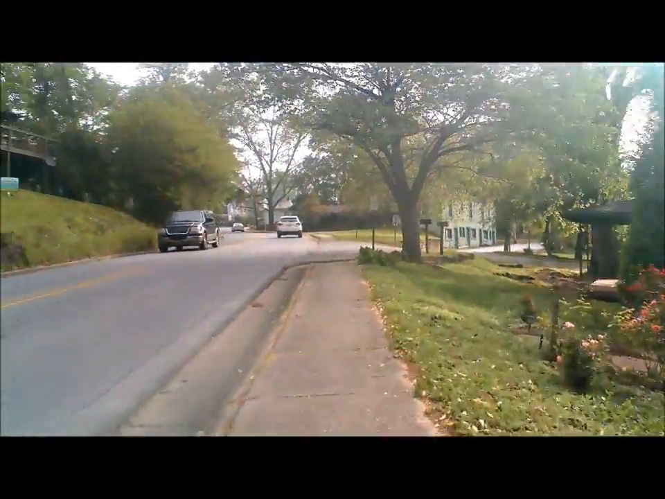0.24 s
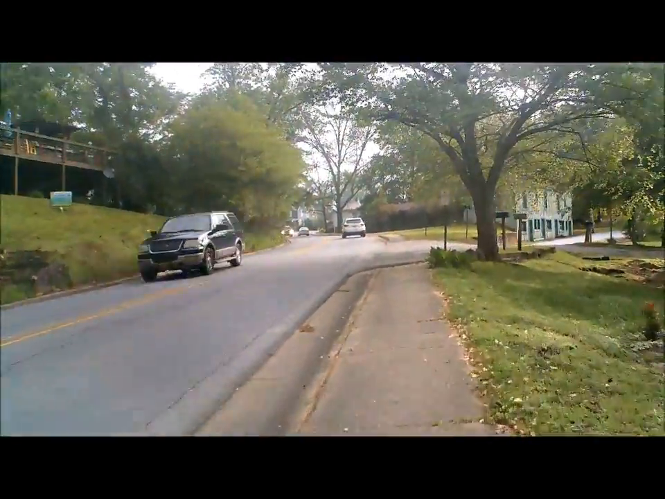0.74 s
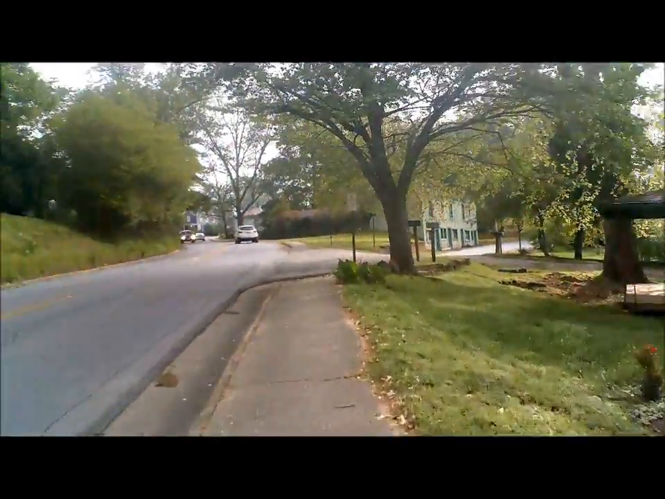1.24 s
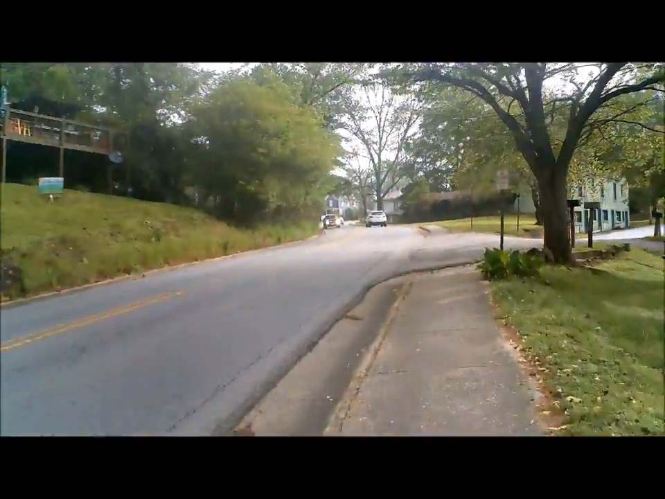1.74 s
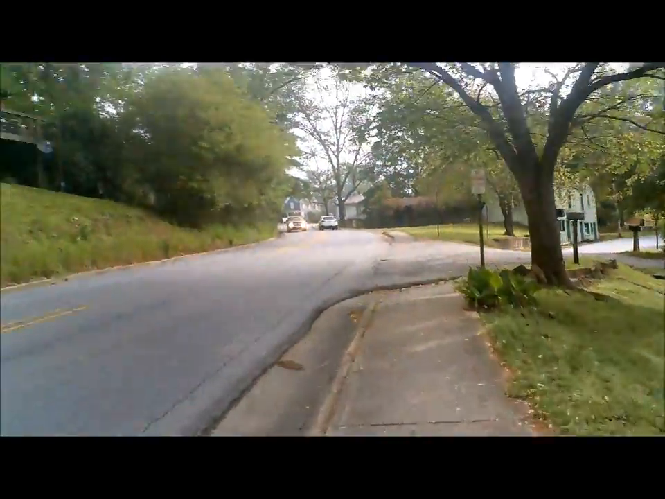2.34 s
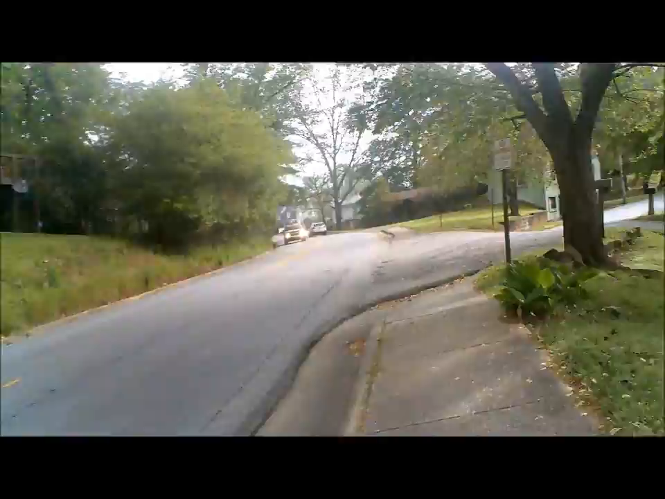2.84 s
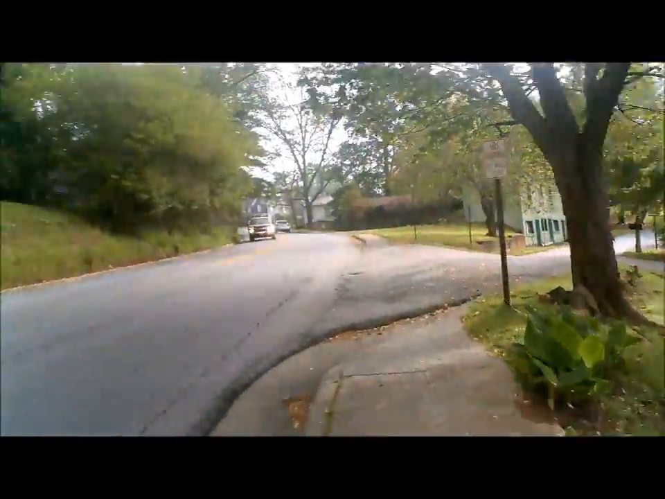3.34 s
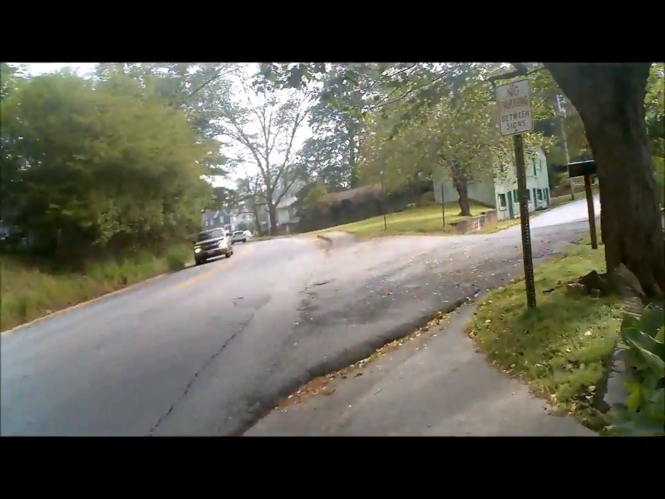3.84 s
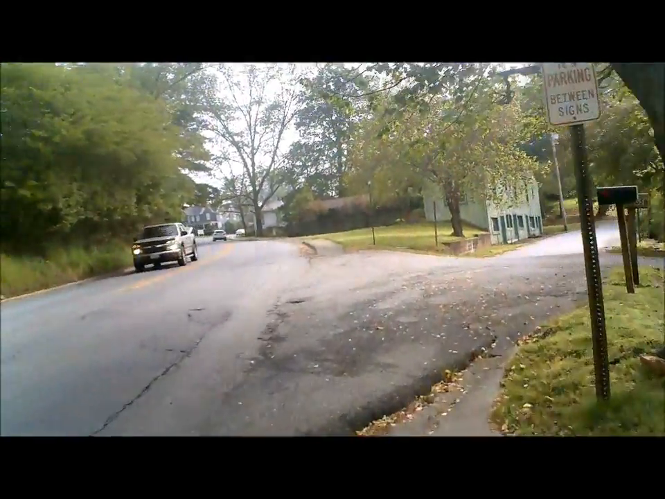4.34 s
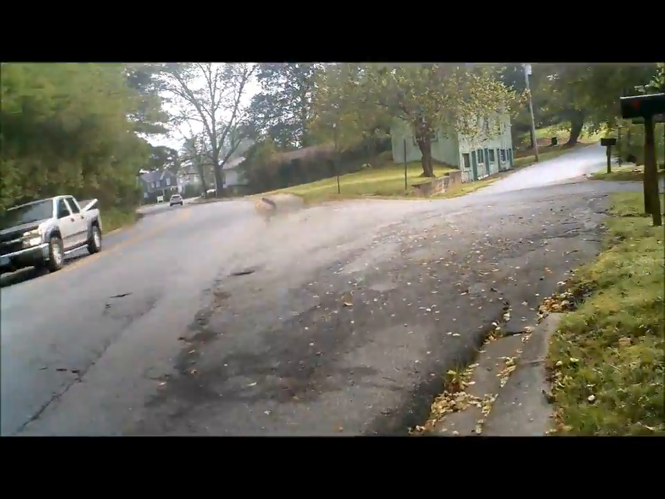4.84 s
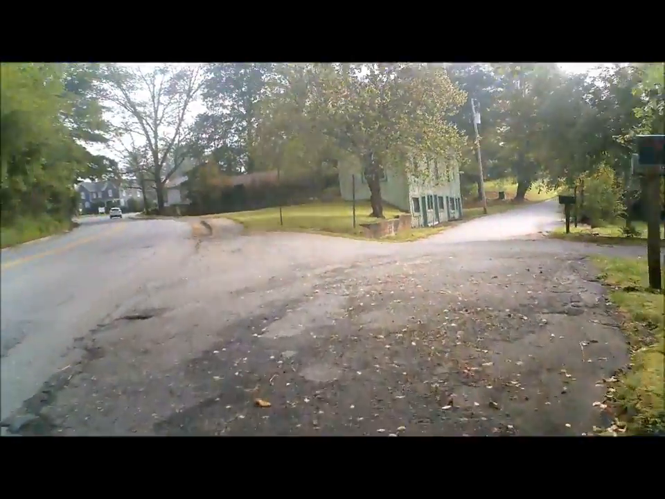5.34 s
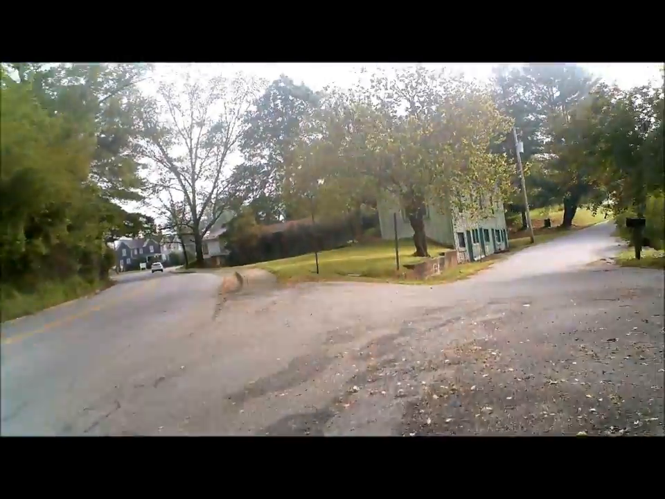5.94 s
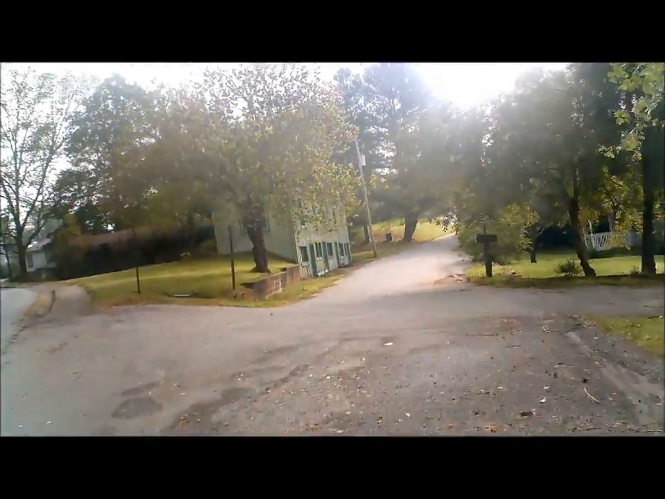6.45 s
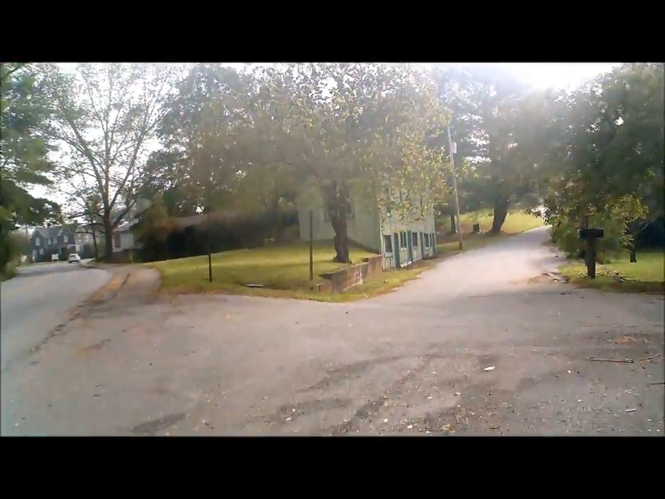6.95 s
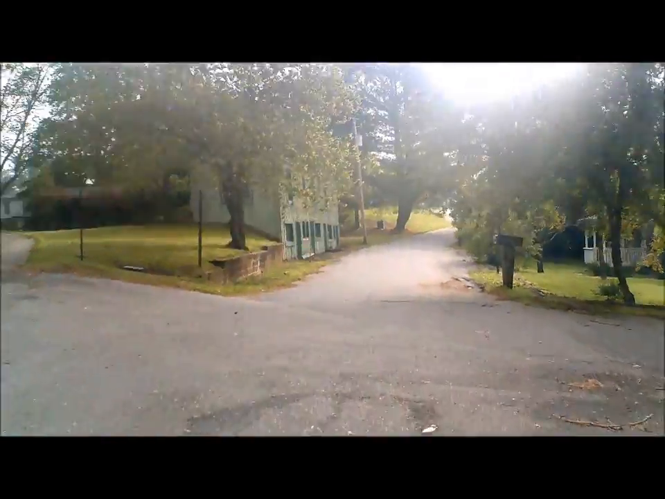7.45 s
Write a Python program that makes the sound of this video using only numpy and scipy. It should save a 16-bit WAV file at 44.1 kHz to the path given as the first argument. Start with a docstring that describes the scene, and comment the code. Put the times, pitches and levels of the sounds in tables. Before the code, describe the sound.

Close on a bicycle's handlebar outdoors, a loose mount knocks in uneven bursts of click, hollow clack and dull thud. The hardest jolt comes early, nearly overloading the microphone. More clusters follow over pavement joints, with short grainy shudders, then the surface smooths, leaving low frame hum, soft tyre roar, lumpy air, hiss and a few faint pings.

```python
"""On a pavement, a bicycle rolls along with a camera on its handlebar. Shaped noise makes the tyre roar and the
lumpy air on the microphone; noise through resonances makes the frame hum, the fork and a faint chatter.
At joints and kerbs the loose mount knocks: decaying sine modes sound its click, clack, hollow note and thud.
Each knock also jolts the frame and leaves a grainy shudder. Two kerb drops push the microphone; on smooth
ground there are single pings. The preamplifier hisses and clips, and the treble ends below 8 kHz."""
import sys
import numpy as np
from scipy import signal
from scipy.fft import rfft, irfft, next_fast_len
from scipy.io import wavfile
from scipy.ndimage import uniform_filter1d, map_coordinates

SR = 44100
rng = np.random.default_rng(int(sys.argv[2]) if len(sys.argv) > 2 else 0)


def output_pcm(signal):
    """Save a mono or channel-first signal as 16-bit PCM at the path in sys.argv[1].

    Samples are clipped to [-1, 1] before scaling.
    """
    pcm = np.clip(np.atleast_2d(signal).T, -1, 1) * 32767
    wavfile.write(sys.argv[1], SR, np.round(pcm).astype(np.int16))


N = 340011


def amp(db):
    """Decibels to amplitude."""
    return 10 ** (np.asarray(db) / 20)


def unit(x):
    """x scaled to rms 1."""
    return x / np.sqrt(np.mean(x ** 2) + 1e-20)


def wobble(rate):
    """A smooth random curve, rate knots a second."""
    knots = rng.standard_normal(int(N * rate / SR) + 4)
    return map_coordinates(knots, [np.arange(N) * rate / SR])


def filtered(x, response):
    """x shaped by a complex response of frequency."""
    size = next_fast_len(N + SR // 2)
    spectrum = rfft(x, size) * response(np.fft.rfftfreq(size, 1 / SR))
    return irfft(spectrum, size)[:N]


def coloured(points):
    """Noise of rms 1 whose spectrum follows the (hz, db) points."""
    points_hz, points_db = np.transpose(points)

    def response(hz):
        return amp(np.interp(np.log(hz + 1), np.log(points_hz), points_db))

    return unit(filtered(rng.standard_normal(N), response))


def resonances(modes):
    """Causal response of (hz, width_hz, level_db) modes, summed with alternating sign."""
    def response(f):
        total = 0
        for k, (hz, width_hz, db) in enumerate(modes):
            damping = 1j * f * width_hz
            total = total + (-1) ** k * amp(db) * damping / (hz * hz - f * f + damping)
        return total

    return response


# single knocks of the mount: start_s, click_db [peak], click_hz [favoured centre], hollow_db [peak],
# thud_db [peak], thud_hz [favoured centre], clack_db [peak], length [decay factor]
KNOCKS = [(0.138, -37, 2670.0, -29.5, -29.5, 810.0, -39.5, 0.97),
          (0.246, -23, 3480.0, -18.5, -13.5, 744, -28, 1.38),
          (0.3146, -37, 2410.0, -28.5, -31.0, 676, -40, 0.89),
          (0.4406, -6.0, 2730.0, -14, -15.0, 760, -18, 0.8),
          (0.5555, -9, 3380.0, -13, -16.5, 870.0, -15, 0.96), (0.6301, -43, 3430, -33, -32, 720, -58, 2.4),
          (0.6514, -5, 2960.0, -13.5, -20, 760, -10.5, 0.89),
          (0.7417, -31.5, 2620.0, -28.5, -28.5, 740, -29.5, 1.04),
          (0.8003, -6.5, 2640.0, -11, -7, 706, -28, 1.2), (0.808, 3.5, 3280.0, -2, -1, 700, 2.5, 0.89),
          (0.82, -17.5, 2750.0, -9, -10.5, 700.0, -19, 1.45),
          (0.837, -12.5, 3770.0, -14, -16, 664, -30, 0.59),
          (0.864, -48, 3010.0, -28, -28.5, 685, -38.5, 1.1),
          (0.9551, -19.5, 2600.0, -20, -8.5, 790, -19.5, 1.3),
          (1.0138, -27.5, 2460.0, -22.5, -18.5, 740.0, -35, 1.7),
          (1.042, -38, 2850.0, -27, -19, 700, -39.5, 1.15),
          (1.088, -40, 3300.0, -37, -18.5, 560.0, -41, 2.1),
          (1.1402, -16.5, 3430.0, -18.5, -20.5, 750, -36, 0.85),
          (1.2728, -40.5, 2630.0, -37, -26.5, 740, -44, 1.2),
          (1.343, -35, 3520.0, -36.5, -26.5, 656, -40, 3.3),
          (1.69, -39, 2530.0, -32.5, -31, 654, -48.5, 0.89), (1.713, -40.5, 2740, -44, -48.5, 703, -57, 3),
          (1.886, -51, 3550.0, -29, -23.5, 773, -42.5, 1.5),
          (2.1725, -42.5, 2640.0, -52, -44.0, 760.0, -57, 1.9),
          (2.2628, -29, 2680.0, -18.5, -13.5, 704, -32, 1.6),
          (2.313, -34.5, 3530.0, -44, -24.5, 810.0, -42, 1.4),
          (2.3492, -31, 2540.0, -25, -24.0, 830.0, -31.0, 1.5),
          (2.3835, -21.5, 2950.0, -15, -6.5, 770.0, -26, 1.5),
          (2.403, -40, 3060.0, -39, -17, 670, -46, 0.95), (2.425, -44, 3300, -28.5, -33, 740, -42, 0.67),
          (2.4693, -44, 3010.0, -30, -20.5, 766, -35, 1.65),
          (2.523, -37.5, 2530.0, -28.5, -35.5, 716, -38, 2.9),
          (2.5984, -6.5, 3270.0, -1, -19.5, 780, -18, 0.94),
          (2.67, -44.5, 2400, -43.5, -42.5, 740, -60, 1.5),
          (2.7382, -36, 2720.0, -23.5, -24, 687, -50.5, 2), (2.772, -43, 3070.0, -45, -27, 670.0, -52, 1),
          (2.8175, -36, 3490.0, -34.5, -23.5, 690.0, -39.5, 1.5),
          (2.8511, -46, 2970.0, -37.5, -23, 670.0, -44.0, 1.44),
          (2.912, -41.0, 2710.0, -38, -26, 690.0, -48.5, 1.3),
          (3.009, -47, 3460.0, -50.5, -44.5, 745, -67, 1.2),
          (3.1124, -46, 3400.0, -43, -28, 790.0, -43, 0.66),
          (3.228, -17, 2450.0, -7, -11.5, 660, -14.5, 0.92),
          (3.2473, -36.5, 2780.0, -22.5, -23.5, 630.0, -39, 1.9),
          (3.3221, -37.5, 2580.0, -20, -19.5, 674, -38, 2),
          (3.361, -20, 3300.0, -9.5, -6.5, 734, -16.5, 1.72),
          (3.6295, -6, 2770.0, -1, -16.5, 810, -17, 0.83), (3.693, -46, 3400, -41.5, -39, 640, -46, 1.4),
          (3.7295, -40, 2700.0, -35, -26.5, 690.0, -44, 1.75),
          (3.774, -33.5, 2490.0, -31.5, -24, 776, -41, 1.83),
          (3.8686, -33.5, 3070.0, -32.5, -18.5, 670, -51, 1.4),
          (4.2154, -25, 3090.0, -17.5, -10, 720.0, -22.5, 1.61),
          (4.2276, -32, 3490.0, -28, -22, 635, -34, 0.97),
          (4.372, -23.5, 2710.0, -13, -10.5, 800.0, -33, 1.47),
          (4.393, -44, 2770.0, -24.5, -19.5, 600.0, -42, 1.04),
          (4.813, -57, 3500.0, -49, -33.5, 730.0, -47, 1.24),
          (5.244, -47, 2770.0, -45.5, -34, 807, -50, 1.1), (7.6089, -39, 3000, -42.5, -45, 712, -48, 0.39),
          (7.694, -41, 2630.0, -52, -30.5, 790, -53, 1.35)]
# runs in which the mount buzzes: start_s, end_s, and mean click_db, hollow_db, thud_db, clack_db [peaks]
BUZZES = [(1.099, 1.195, -34, -23, -20.5, -38)]
BUZZ_GAP_S, BUZZ_JITTER_S, BUZZ_SCATTER_DB = 0.0125, 0.002, 2.5
BUZZ_CLICK_HZ, BUZZ_THUD_HZ, BUZZ_LENGTH = 3420, 740, 0.94


def blows():
    """Every contact of the mount: the single knocks and the quick, uneven runs of a buzz."""
    contacts = list(KNOCKS)
    for start, end, click_db, hollow_db, thud_db, clack_db in BUZZES:
        for s in np.arange(start, end, BUZZ_GAP_S):
            late_s = rng.normal(0, BUZZ_JITTER_S)
            click, hollow, thud, clack = rng.normal(0, BUZZ_SCATTER_DB, 4)
            contacts.append((s + late_s, click_db + click, BUZZ_CLICK_HZ, hollow_db + hollow,
                             thud_db + thud, BUZZ_THUD_HZ, clack_db + clack, BUZZ_LENGTH))
    return contacts


# the steady ride: time_s, hum_db [frame], roar_db [road roar, swelling as traffic passes], fork_db
RIDE = [(0.0, -43, -44.5, -61), (0.36, -50, -46.5, -49), (0.68, -44.5, -42, -48), (0.99, -48, -34, -46),
        (1.44, -42, -45.5, -43), (1.72, -46, -47.5, -48), (2.25, -41, -46, -51), (2.42, -39, -51, -46),
        (3.0, -40, -51.5, -46), (3.54, -45, -58, -45.5), (3.8, -37, -59.5, -51.5),
        (4.14, -45.5, -49.5, -56.5), (4.42, -38.5, -46.5, -46), (4.85, -43.5, -51.5, -60),
        (5.97, -47.5, -49.5, -49.5), (6.51, -43, -49.5, -54), (6.83, -45, -50.5, -47.5),
        (7.71, -44, -49.5, -58)]
# level of each layer under the shake [dB]: hum, roar, fork, chatter
SHAKEN_DB = [-20.5, -30.5, -31.5, -39.5]
SHAKE_T60_S, SHAKE_RISE_S = 0.78, 0.03  # the whole bicycle shakes on after each thud
CHATTER_DB = -19  # steady chatter, relative to the tyre roar


def ride(contacts):
    """Levels of hum, roar, fork and chatter: steady ride power plus the shake that follows the thuds."""
    times, *columns = np.transpose(RIDE)
    hum_db, roar_db, fork_db = [np.interp(np.arange(N) / SR, times, column) for column in columns]
    steady = hum_db, roar_db, fork_db, roar_db + CHATTER_DB
    thud_power, t = np.zeros(N), np.arange(SR) / SR
    for s, _, _, _, thud_db, *_ in contacts:
        thud_power[round(s * SR)] = amp(2 * thud_db)
    swell = (1 - np.exp(-t / SHAKE_RISE_S)) * amp(-2 * 60 * t / SHAKE_T60_S)
    shake = np.abs(signal.fftconvolve(thud_power, swell)[:N])
    return [10 * np.log10(amp(2 * db) + shake * amp(2 * under)) for db, under in zip(steady, SHAKEN_DB)]


# resonances, the fork first and the frame after it: pitch_hz, width_hz, level_db [relative]
FRAME = [(70.9, 3.4, -4), (258.8, 33.8, -5.5), (307, 14.1, 5), (723, 66, -19.5), (983.5, 8.2, -6.5)]


def frame_hum(level_db):
    """Slightly uneven road grain keeps the frame's modes humming."""
    grain = amp(0.41 * wobble(7.4)) * rng.standard_normal(N)
    return amp(level_db) * unit(filtered(grain, resonances(FRAME[1:])))


# colour of the tyre roar: pitch_hz, level_db [per Hz, relative]
TYRES = [(220, -42), (380, -10.5), (555, -10.5), (592, -8.5), (667, -1.5), (906, -7.5), (974, -7),
         (1020, 2.5), (1060, -18), (1150, -10), (2210, -30.5), (2600, -33.5), (3380, -39), (5720, -120)]


def tyre_roar(level_db):
    """Tyres roar as coloured noise with a fast and a slow unevenness."""
    return amp(level_db + 0.79 * wobble(25) + 1.3 * wobble(5)) * coloured(TYRES)


def fork_rumble(level_db):
    """Noise drives the fork's low resonance, which sways slowly in level."""
    fork = resonances(FRAME[:1])
    rumble = filtered(rng.standard_normal(N), lambda f: fork(f) * f / (f + 60))
    return amp(level_db + 2 * wobble(4)) * unit(rumble)


# strength of the air: time_s, level_db
GUSTS = [(0, -44), (1.1, -42.5), (1.45, -50), (2.2, -50), (2.45, -45), (3.0, -49), (3.4, -55), (4.5, -55),
         (5.2, -56), (6.5, -59), (6.9, -50), (7.4, -57), (7.71, -44)]
# colour of the air: pitch_hz, level_db [per Hz, relative]
AIR = [(15, -39), (30, -8), (60, -4), (120, -3), (200, -3.5), (400, -12), (900, -44), (2000, -90.5)]


def air_buffet():
    """Air buffets the microphone: low noise in quick lumps, under the slower gusts."""
    gust_db = np.interp(np.arange(N) / SR, *np.transpose(GUSTS))
    return amp(gust_db + 2.5 * wobble(37)) * coloured(AIR)


# housing modes, all three groups: pitch_hz, level_db [relative], decay_s [nominal, before the length factor]
CLICK = [(2375, 1.5, 0.023), (2613, -5.5, 0.053), (3082, -9, .04), (3370, -14, 0.028), (3473, -6.5, 0.042),
         (3847, -1.5, 0.022), (4194, -11, 0.039), (4850, -7, 0.049), (5388, -10, 0.029), (6095, -6, 0.03),
         (6880, -10.5, 0.037)]
CLACK = [(1769, 4, 0.041), (1480, -6, 0.053), (2143, -25, 0.044), (1520, 2.5, 0.0073), (2141, -8, 0.029)]
HOLLOW = [(1137.7, 16, 0.044), (1057, -15, 0.08), (1282, -16, 0.024)]
CHATTER_HOLLOW_DB = -6  # light ticks hardly stir the hollow note
CHATTER_TOP_HZ = 4000  # soft ticks reach little above this


def chatter(level_db):
    """Loose parts tick faintly against the housing: random impulses in clumps through its resonances."""
    chance = 500 / SR * amp(4.5 * wobble(14))  # around 500 ticks a second
    ticks = (rng.random(N) < chance) * amp(6.1 * rng.standard_normal(N)) * rng.standard_normal(N)
    modes = CLICK + CLACK + [(hz, db + CHATTER_HOLLOW_DB, decay_s) for hz, db, decay_s in HOLLOW]
    housing = resonances([(hz, 4.6 / decay_s, db) for hz, db, decay_s in modes])
    ringing = filtered(ticks, lambda f: housing(f) / (1 + 1j * f / CHATTER_TOP_HZ) ** 2)
    return amp(level_db) * unit(ringing)


def ring(modes, length, rough, rise_s, centre_hz=None, focus_db=0):
    """One soft-edged blow on decaying sine modes, peak 1; rough blows smear each mode with noise."""
    t = np.arange(SR // 9) / SR
    hz, db, decay_s = np.transpose(modes)[..., None]
    smear = rng.standard_normal((len(modes), len(t)))
    for _ in range(3):
        smear = uniform_filter1d(smear, size=36, axis=1)
    detuned = hz * (1 + rng.normal(0, 0.013, hz.shape))
    sines = np.sin(2 * np.pi * (detuned * t + rng.random(hz.shape)))
    carrier = sines * (1 - rough + rough * unit(smear))
    life = t / (decay_s * length)
    # the mount grips again soon after the blow: a quick fall, then a weak free tail
    fall = np.exp(-(life / 0.18) ** 2) + 0.22 * amp(-48 * life)
    swell = (1 - np.exp(-t / rise_s)) ** 3 * fall
    # where the blow lands favours the modes near centre_hz, by focus_db per octave
    favour_db = -focus_db * np.abs(np.log2(hz / (centre_hz or hz[0])))
    scatter_db = rng.normal(0, 2.5, hz.shape)
    x = np.sum(amp(db + favour_db + scatter_db) * carrier * swell, axis=0)
    return x / np.abs(x).max()


# thud modes of the housing: pitch_hz, level_db [relative], decay_s [nominal, before the length factor]
THUD = [(782.2, 4, 0.024), (536, -12, 0.19), (675, -5, 0.067), (853, -4.5, 0.088), (448, -8, 0.05)]
FOCUS_DB, FOCUS_GROWS = 6.5, 0.36  # click focus, dB per octave; a weaker blow is narrower
CLEANEST = 0.2  # least roughness of the hollow note


def knocks(contacts):
    """Each contact strikes the housing's four groups of modes: click, clack, hollow note and thud."""
    out = np.zeros(N + SR)
    for s, click_db, click_hz, hollow_db, thud_db, thud_hz, clack_db, length in contacts:
        # a dull blow through the tyre is crunchy, a direct tap on the housing rings cleaner
        rough = np.clip(0.45 + 0.0053 * (thud_db - max(click_db, hollow_db)), 0.1, 0.8)
        hollow_rough = np.clip(0.48 + 0.036 * (thud_db - hollow_db), CLEANEST, 0.8)
        focus_db = FOCUS_DB - FOCUS_GROWS * click_db
        blow = amp(click_db) * ring(CLICK, length, rough, 0.0014, click_hz, focus_db)
        blow += amp(clack_db) * ring(CLACK, length, rough, 0.003)
        blow += amp(hollow_db) * ring(HOLLOW, length, hollow_rough, 0.003)
        blow += amp(thud_db) * ring(THUD, length, rough, 0.001, thud_hz, focus_db=29.0)
        out[round((s - 0.0008) * SR):][:len(blow)] += blow
    return out[:N]


JOLT_DB, JOLT_GROWS = 29, 0.62  # low jolt: offset, and dB per dB of thud


def frame_jolts(contacts):
    """Each contact sends impulses into the frame, whose low modes and highest mode ring on."""
    low_jolts, high_jolts = np.zeros(N), np.zeros(N)
    for s, _, _, hollow_db, thud_db, _, _, length in contacts:
        low_jolt = length * amp(JOLT_GROWS * thud_db + JOLT_DB)
        low_jolts[round((s + 0.005) * SR)] = low_jolt * rng.choice([-1, 1])
        # the frame takes up only part of a harder tap
        high_jolts[round((s + 0.004) * SR)] = amp(0.33 * max(hollow_db, thud_db) + 36)
    low = filtered(low_jolts, resonances(FRAME[1:4]))
    high = filtered(high_jolts, resonances(FRAME[4:]))
    # the soft mount lets little of the jolt's lowest part through
    return signal.sosfilt(signal.butter(4, 230, "high", fs=SR, output="sos"), low + high)


# colour of the shudder: pitch_hz, level_db [per Hz, relative]
CRUNCH = [(250, -33.5), (500, 5), (1000, 10), (1800, -14.5), (3500, -15), (6500, -22.5), (9000, -63)]
SHUDDER_T60_S, SHUDDER_RISE_S = 0.15, 0.0053


def shudder(contacts):
    """After each thud the whole bicycle shakes on in a dying rattle of grainy noise."""
    starts, t = np.zeros(N), np.arange(SR // 3) / SR
    for s, _, _, _, thud_db, _, _, length in contacts:
        starts[round(s * SR)] = length ** 2 * amp(thud_db - 22.5)  # a longer contact shakes more
    swell = (1 - np.exp(-t / SHUDDER_RISE_S)) * amp(-60 * t / SHUDDER_T60_S)
    level = signal.fftconvolve(starts, swell)[:N]
    grain = amp(3 * wobble(200))
    return level * unit(grain * coloured(CRUNCH))


# drops that shove the microphone itself: start_s, level_db [at onset], pitch_hz
KERB = [(0.813, 6.5, 106.8), (0.817, 1.5, 190)]


def kerb():
    """Low pushes on the microphone's membrane: sines that fall 60 dB in 15 ms."""
    out, t = np.zeros(N + SR), np.arange(SR // 10) / SR
    for s, db, hz in KERB:
        out[round(s * SR):][:len(t)] += amp(db - 60 * t / 0.015) * np.sin(2 * np.pi * hz * t)
    return out[:N]


# faint single pings of the housing on smooth ground: start_s, level_db [peak]
PINGS = [(6.2058, -45.5), (6.2242, -40), (6.2562, -49), (6.4155, -50), (6.49, -49), (6.558, -51),
         (7.0484, -37.5), (7.13, -56), (7.152, -50), (7.2888, -48.5)]


def pings():
    """A light touch rings the housing fairly cleanly, mostly in its click modes near 2600 Hz."""
    out = np.zeros(N + SR)
    for s, db in PINGS:
        ping = amp(db) * ring(CLICK, 1.0, 0.17, 0.0013, centre_hz=2600, focus_db=17)
        out[round(s * SR):][:len(ping)] += ping
    return out[:N]


def scene():
    """The rolling bed, the mount's contacts with all they set off, the kerb drops and the pings."""
    contacts = blows()
    hum_db, roar_db, fork_db, chatter_db = ride(contacts)
    rolling = frame_hum(hum_db) + tyre_roar(roar_db) + fork_rumble(fork_db) + air_buffet()
    struck = knocks(contacts) + frame_jolts(contacts) + shudder(contacts)
    return (rolling + chatter(chatter_db) + struck + kerb() + pings())[None]


# colour of the preamplifier's hiss: pitch_hz, level_db [per Hz, relative]
HISS = [(1060, -17), (1800, -6), (2200, -12), (2660, -9), (6380, -11), (7080, -18), (7340, -23),
        (7710, -35), (10000, -76.5), (17000, -120)]
HISS_DB = -61  # rms, before the clipping and treble roll-off
ROLLOFF_HZ, TOP_HZ = 7150, 7800


def record(dry):
    """The preamplifier hisses and clips softly near 0.9; the camera's treble rolls off and ends."""
    x = dry[0] + amp(HISS_DB) * coloured(HISS)
    x = x / (1 + np.abs(x / 0.9) ** 6) ** (1 / 6)
    x = filtered(x, lambda hz: (hz < TOP_HZ) / (1 + (hz / ROLLOFF_HZ) ** 60))
    return x[None]


dry = scene()
out = record(dry)
output_pcm(out)
```